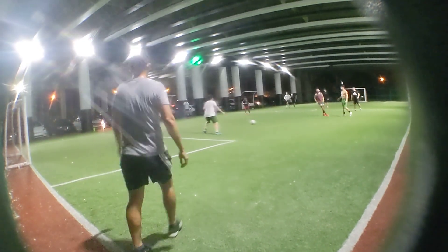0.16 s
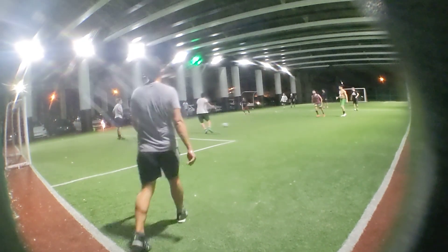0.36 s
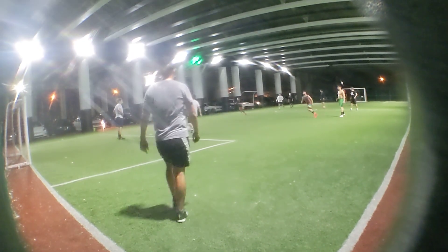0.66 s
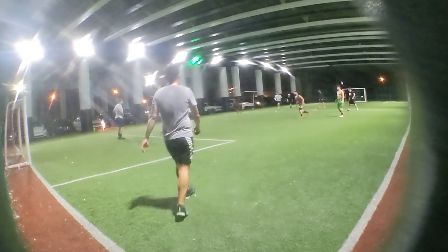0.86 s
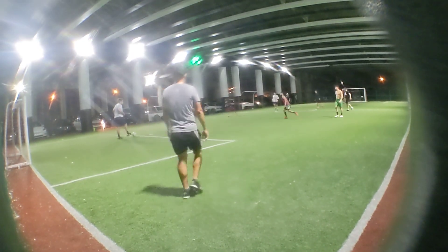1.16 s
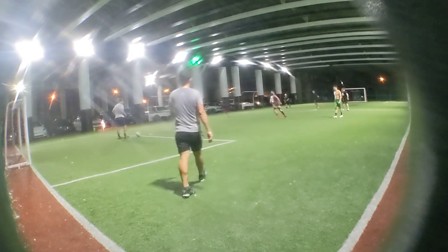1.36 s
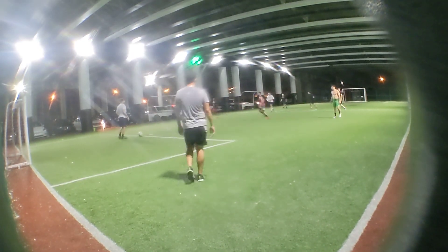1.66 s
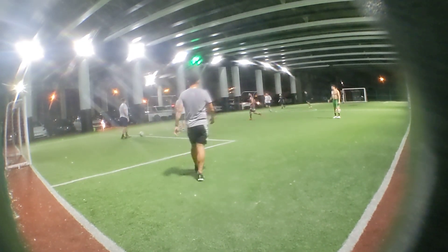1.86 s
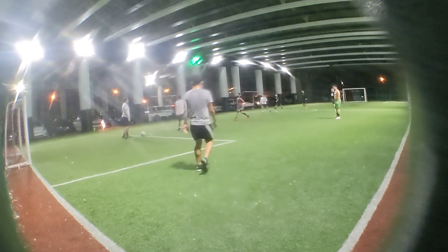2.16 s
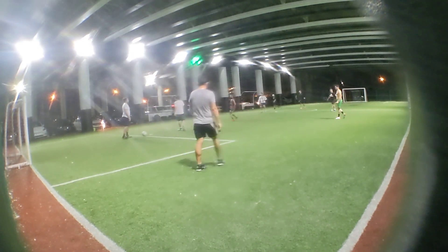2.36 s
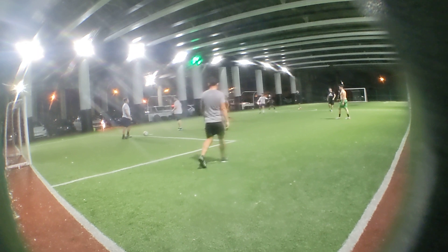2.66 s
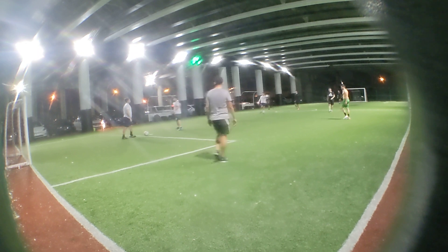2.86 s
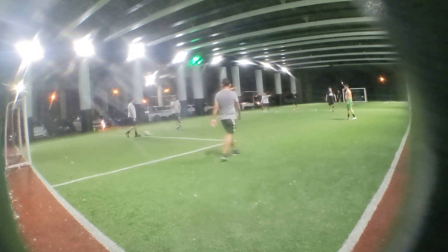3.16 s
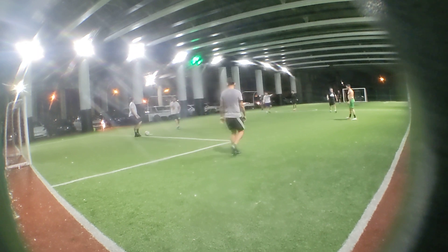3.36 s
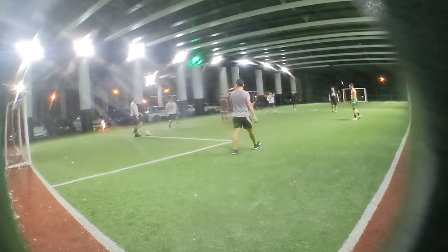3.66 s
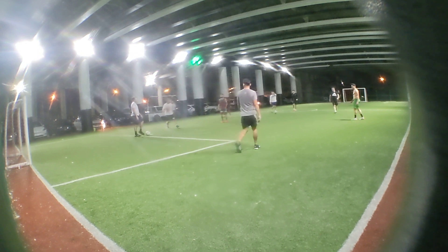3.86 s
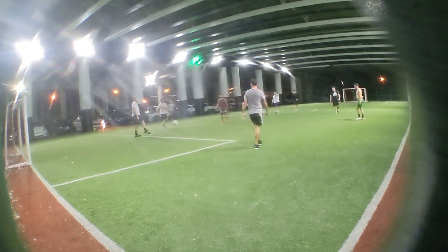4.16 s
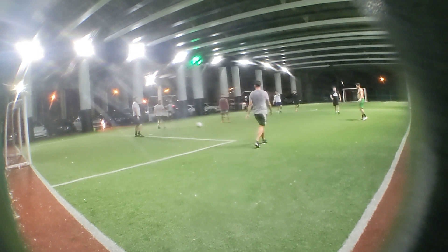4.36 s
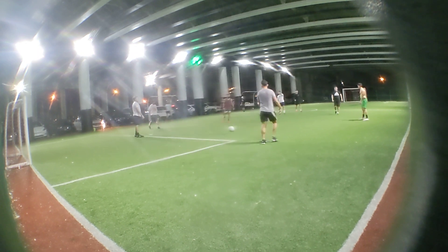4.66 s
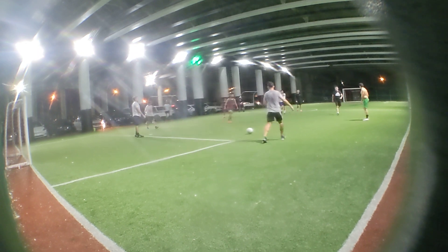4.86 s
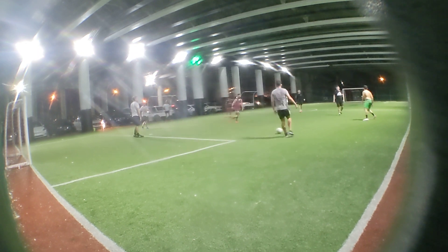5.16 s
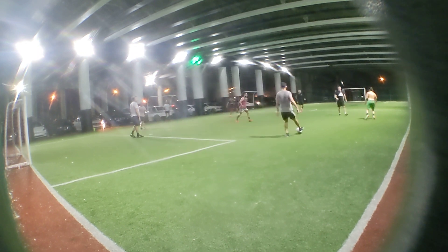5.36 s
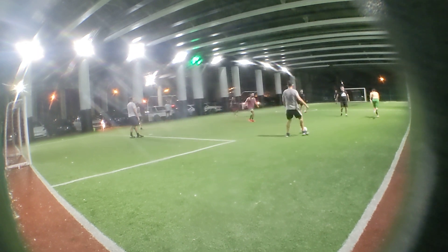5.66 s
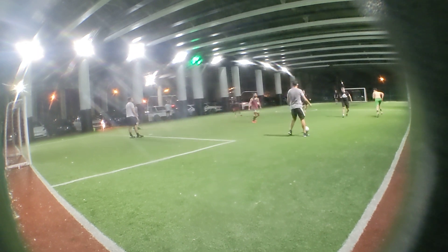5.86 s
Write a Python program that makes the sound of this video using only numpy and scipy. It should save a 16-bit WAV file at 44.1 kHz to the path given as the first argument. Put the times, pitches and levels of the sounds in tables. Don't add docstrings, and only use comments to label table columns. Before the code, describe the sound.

Low steady traffic rumble and hollow tyre roar from a road deck overhead, with faint stud ticks on turf and one tiny rubber squeak.

```python
import sys
import numpy as np
from scipy import signal
from scipy.fft import rfft, irfft, next_fast_len
from scipy.io import wavfile
from scipy.ndimage import uniform_filter1d, map_coordinates

SR = 44100
rng = np.random.default_rng(int(sys.argv[2]) if len(sys.argv) > 2 else 0)


def invert_db(level):
    return 10 ** (np.asarray(level, dtype=float) / 20)


def wav_out(sig):
    wavfile.write(sys.argv[1], SR, np.round(np.clip(np.atleast_2d(sig).T, -1, 1) * 32767).astype(np.int16))


N = 265032

# time in seconds, level in dB.
NEARNESS = [(0, -1.5), (.35, -2.5), (.62, -1), (1.17, -2), (1.54, 1), (2.26, 2), (3.58, 1.5), (3.8, 0),
            (4.07, -1), (5.04, -2.5), (5.37, -2.5), (5.71, -1), (6.01, -3)]


def unit(x):
    return x / np.sqrt(np.mean(x ** 2) + 1e-20)


def along(points, hz):
    f, value = np.transpose(points)
    return np.interp(np.log(hz + 1), np.log(f), value)


def curve(rows):
    seconds, value = np.transpose(rows)
    return np.interp(np.arange(N) / SR, seconds, value)


def wobble(rate):
    knots = rng.standard_normal(N // 100)
    return map_coordinates(knots, [np.arange(N) * rate / SR])


def filtered(x, response):
    pad = SR // 4
    m = next_fast_len(N + 2 * pad)
    wide = np.pad(x, ((0, 0), (pad, pad)), "reflect")
    spectrum = rfft(wide, m) * response(np.fft.rfftfreq(m, 1 / SR))
    return irfft(spectrum, m)[:, pad:pad + N]


def diffuse(spectrum, patchy_db):
    spacing_m, sound_speed, stray = 0.16, 343, 0.012
    z = signal.stft(rng.standard_normal((2, N)), nperseg=512)[2]
    field = uniform_filter1d(rng.standard_normal(z.shape[1:]), size=6, axis=0)
    field = uniform_filter1d(field, size=14, axis=1)
    pair = signal.istft(z * invert_db(patchy_db * unit(field)), nperseg=512)[1][:, :N]

    def share(hz):
        likeness = (1 - stray) * np.sinc(2 * hz * spacing_m / sound_speed)
        turn = np.arccos(likeness) / 2
        return invert_db(along(spectrum, hz)) * np.array([np.cos(turn), np.sin(turn)])

    mid, side = filtered(pair, share)
    return np.array([mid + side, mid - side]) / np.std(mid)


def evened(x):
    even_s, even_share = 0.15, 0.35
    power = np.abs(uniform_filter1d(np.mean(x ** 2, axis=0), round(even_s * SR))) + 1e-3
    y = x / power ** (even_share / 2)
    return y / np.std(y.mean(axis=0))


def swells(rows):
    t = np.arange(N) / SR
    return np.sqrt(sum(invert_db(2 * db) * np.exp(-((t - s) / length) ** 2) for s, db, length in rows))


def tyres():
    # frequency in Hz, level in dB per Hz.
    near_spectrum = [(180, -57), (330, -6), (420, -1.5), (620, -3.5), (800, -7), (960, -6.5), (1150, -16.5),
                     (1600, -18), (2500, -47), (5000, -90)]
    wash_spectrum = [(600, -54.5), (1100, 2), (1500, -1.5), (2000, -2.5), (2600, -6.5), (3000, -12),
                     (3600, -17.5), (5000, -53), (9000, -88.5)]
    hiss_spectrum = [(1500, -41), (3000, 1), (4000, 0), (5000, -3.5), (6500, -6.5), (7500, -9.5),
                     (9000, -12.5), (10800, -18), (13000, -20), (15700, -21.5), (22000, -23)]
    near_db = curve(NEARNESS)
    near = invert_db(-32.5 + near_db) * diffuse(near_spectrum, patchy_db=0.8)
    wash = invert_db(-42.5 + 0.23 * near_db) * diffuse(wash_spectrum, patchy_db=0.25)
    hiss = invert_db(-54 + 0.34 * near_db + 0.54 * wobble(3.8)) * diffuse(hiss_spectrum, patchy_db=0.5)
    return near + wash + hiss


def traffic():
    # time in seconds, level in dB.
    engines = [(0, 1.5), (.5, -2), (1.1, 1.5), (1.8, 2), (2.6, 2.5), (3.3, -1), (3.75, 2.5), (3.9, -1),
               (4.3, 0), (4.6, -3.5), (5.2, 0), (5.7, -3), (6.01, -6)]
    # centre in seconds, level in dB, length in seconds.
    heavy_axles = [
        (1.25, -23, 0.093),
        (1.79, -18, 0.036),
        (3.26, -21, 0.048),
        (4.7, -25.5, 0.02),
        (5.76, -29.5, 0.031),
    ]
    # frequency in Hz, level in dB per Hz.
    rumble_spectrum = [(20, -41), (32, -34), (45, -14.5), (65, -6), (100, -4), (128, 0.5), (145, -2),
                       (160, -18.5), (220, -34), (400, -85)]
    drone_spectrum = [(80, -54.5), (140, -23.5), (165, -8.5), (185, 1), (230, -5.5), (300, -7.5),
                      (350, -14), (450, -27.5), (800, -89)]
    effort_db = curve(engines)
    steady = invert_db(-24 + 0.52 * effort_db + 0.32 * wobble(6.5))
    rumble = np.hypot(steady, swells(heavy_axles))
    drone = invert_db(-25 + 0.81 * effort_db + 0.46 * curve(NEARNESS) + 0.59 * wobble(4.3))
    rumble_noise = evened(diffuse(rumble_spectrum, patchy_db=0.3))
    drone_noise = evened(diffuse(drone_spectrum, patchy_db=-0.56))
    return rumble * rumble_noise + drone * drone_noise


def girder(rows, hz, drift_hz, lag_s, idle_db):
    phase = 2 * np.pi * np.cumsum(hz + drift_hz * wobble(12)) / SR
    port_lag = 2 * np.pi * hz * lag_s * np.array([[0.5], [-0.5]])
    return (swells(rows) + invert_db(idle_db)) * np.sqrt(2) * np.sin(phase - port_lag)


def girders():
    # centre in seconds, hum level in dB, length in seconds.
    low_wheels = [(1.2, -29, 1.5), (.06, -22.5, 0.082), (.23, -11, 0.046), (.34, -20.5, 0.033),
                  (.55, -20, 0.04), (.7, -24.5, 0.025), (.88, -22, 0.051), (.97, -17.5, 0.023),
                  (1.14, -19, 0.026), (1.31, -23, 0.03), (1.46, -16, 0.019), (1.56, -17, 0.023),
                  (1.78, -24.5, 0.11), (2.17, -17, 0.037), (2.47, -21.5, 0.1), (2.76, -23, 0.096),
                  (2.96, -23.5, 0.056), (3.24, -20.5, 0.048), (3.43, -24.5, 0.037), (3.75, -19.5, 0.035),
                  (3.88, -27, 0.025), (4.1, -29, .03), (4.34, -24, 0.063), (4.67, -26, .03),
                  (4.84, -24.5, 0.025), (4.96, -25, 0.036), (5.29, -38, 0.025)]
    mid_wheels = [
        (.35, -29, 0.064),
        (.58, -31.5, 0.026),
        (1.95, -31, 0.033),
        (2.2, -32, 0.033),
        (2.43, -31, 0.039),
        (4.62, -34, 0.035),
        (4.85, -40, 0.071),
    ]
    high_wheels = [
        (.92, -37.5, 0.082),
        (1.3, -40, 0.095),
        (1.63, -40, 0.12),
        (2.77, -38.5, 0.07),
        (3.43, -34, 0.053),
        (3.76, -39.5, 0.064),
        (4.23, -42.5, 0.18),
        (4.77, -39, 0.087),
        (5.4, -31, 0.071),
        (5.71, -32, 0.06),
    ]
    low = girder(low_wheels, hz=159.9, drift_hz=4.45, lag_s=0.00003, idle_db=-39)
    mid = girder(mid_wheels, hz=321, drift_hz=5.89, lag_s=0.00018, idle_db=-45)
    high = girder(high_wheels, hz=369.0, drift_hz=4.014, lag_s=0.0003, idle_db=-46.5)
    return invert_db(-2.0) * low + mid + invert_db(-1.0) * high


def squeak():
    # start in seconds, grip in seconds, level in dB.
    slip = (.3665, 0.012, -40)
    # multiple of the slip rate, level in dB.
    partials = [(1, 1), (2, -8), (3, -24)]
    # frequency in Hz, level in dB per Hz.
    sole_spectrum = [(1500, -35), (2600, 5.5), (3500, -3.5), (4600, -4), (5300, -4), (6800, -13),
                     (8600, -11), (10000, -25), (15000, -31)]
    slip_hz, let_go_hz = 2640, 2320
    let_go_db, let_go_s, edge_s = -18, 0.013, 0.0054
    start, grip, top_db = slip
    t = np.arange(N) / SR - start

    def ramp(s):
        return np.clip((t - s) / edge_s, 0, 1)

    hz = slip_hz + (let_go_hz - slip_hz) * ramp(grip)
    size = ramp(0) * invert_db(top_db + let_go_db * ramp(grip)) * (1 - ramp(grip + let_go_s))
    phase = 2 * np.pi * np.cumsum(hz * (1 + 0.034 * wobble(403))) / SR
    tone = sum(invert_db(level + 3.0 * wobble(400)) * np.sin(k * phase) for k, level in partials)
    scrape = diffuse(sole_spectrum, patchy_db=0)
    return size * (invert_db(-3.0) * tone + invert_db(-3.5) * scrape) * invert_db([[2.5], [-4]])


def studs():
    # start in seconds, low click level in dB,
    # high click level in dB, length in seconds, left-right difference in dB.
    ticks = [(0.006, -53, -58.5, 0.0022, -7), (1.2585, -45, -56.5, .0035, -1.5),
             (1.276, -62, -67.5, 0.0016, 7.5), (1.7585, -50, -54, .003, -8.5),
             (1.769, -52, -74.5, .003, -3), (1.860, -60, -65.5, 0.0036, 1),
             (1.9605, -63, -57.5, 0.0028, -6.5), (1.983, -64, -66, .005, 1.5),
             (3.044, -63, -72.5, .003, 0.5), (3.7405, -50.5, -58.5, .003, -5), (4.036, -60, -66, .004, -1),
             (5.2, -58, -67, .003, 3.5), (5.454, -55, -64.5, .003, -5)]
    scuffs = [
        (0, -64, -71, 0.04, -8),
        (.33, -67, -75, .05, 0),
        (.832, -67, -68.5, 0.041, 5),
        (1.265, -67, -68.5, .04, 0),
        (1.774, -63, -78, 0.085, -2.5),
        (1.938, -67, -68, .06, -0.5),
        (4.03, -62, -69.5, 0.019, -0.5),
    ]
    # frequency in Hz, level in dB per Hz.
    low_spectrum = [(2500, -31), (4300, -1), (5200, -5), (6200, -0.5), (7500, -5), (10500, -10),
                    (14000, -48)]
    high_spectrum = [(7000, -36.5), (10500, -3), (13000, 2), (15500, -3), (22000, -16.5)]
    low, high, ring = np.zeros((3, 2, N + SR))
    t = np.arange(SR // 4) / SR
    stud_tone = invert_db(-4) * np.sin(2 * np.pi * 5850 * t)
    for k, (s, low_db, high_db, length, pan_db) in enumerate(ticks + scuffs):
        u = t / length
        shape = (1 - np.exp(-u / 0.16)) * np.exp(-u ** 2) * invert_db(pan_db * np.array([[0.5], [-0.5]]))
        first = round(s * SR)
        here = slice(first, first + len(t))
        low[:, here] += invert_db(low_db + 8.5) * shape
        high[:, here] += invert_db(high_db + 5.0) * shape
        if k < len(ticks):
            ring[:, here] += invert_db(low_db) * shape * stud_tone
    grit = np.sign(rng.standard_normal((2, 2, N)))

    def colour(x, spectrum):
        return filtered(x, lambda hz: unit(invert_db(along(spectrum, hz))))

    low_click = colour(low[:, :N] * grit[0], low_spectrum)
    high_click = colour(high[:, :N] * grit[1], high_spectrum)
    return low_click + high_click + ring[:, :N]


def scene():
    return tyres() + traffic() + girders() + squeak() + studs()


def band_limit(x):
    return signal.sosfilt(signal.butter(12, 15740, fs=SR, output="sos"), x)


def record(dry):
    # centre in Hz, width in Hz, extra gain as a factor.
    cavity = [(6110, 1960, 1.27), (9600, 5800, -0.46), (12900, 1200, 0.83)]

    def ports(f):
        left = invert_db(-1.0) * np.exp(-2j * np.pi * f * 0.00004)
        rings = sum(g * 1j * f * w / (c * c - f * f + 1j * f * w) for c, w, g in cavity)
        right = invert_db(-0.32) * (1 + rings)
        return (f < 15760) * np.array([left, right])

    return band_limit(filtered(dry, ports))


dry = scene()
out = record(dry)
wav_out(out)
```